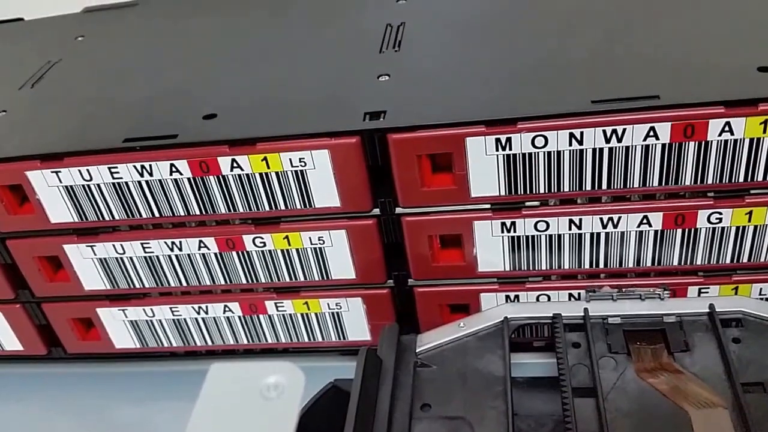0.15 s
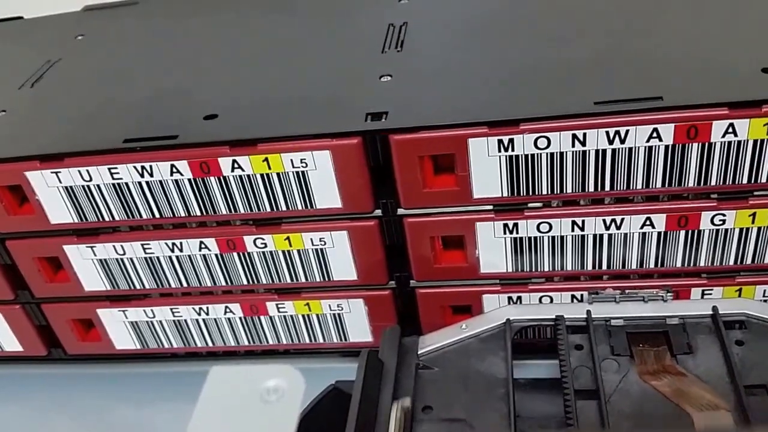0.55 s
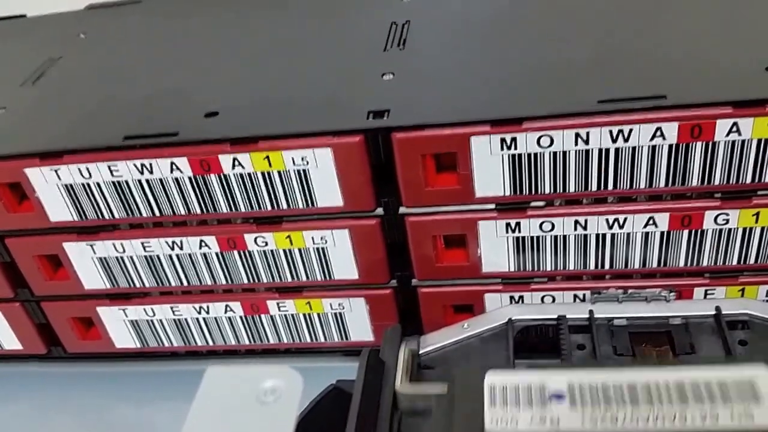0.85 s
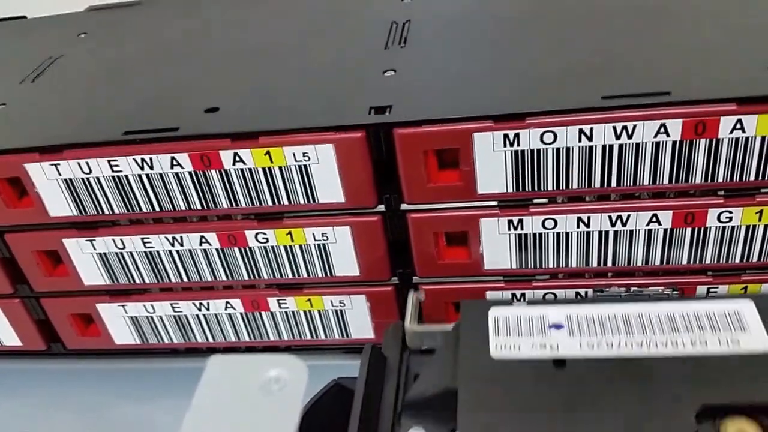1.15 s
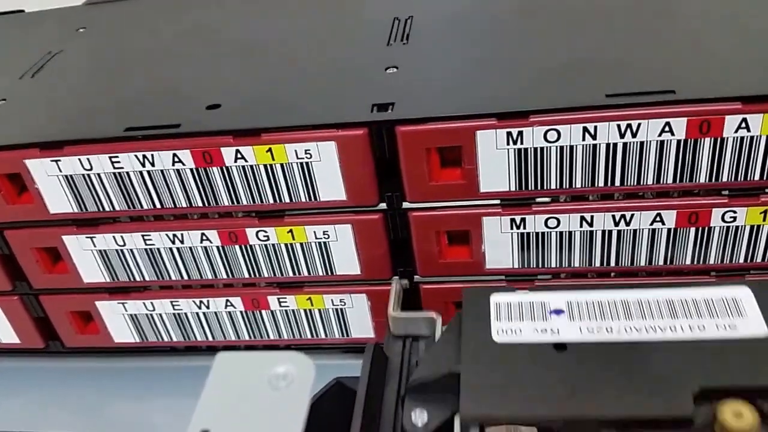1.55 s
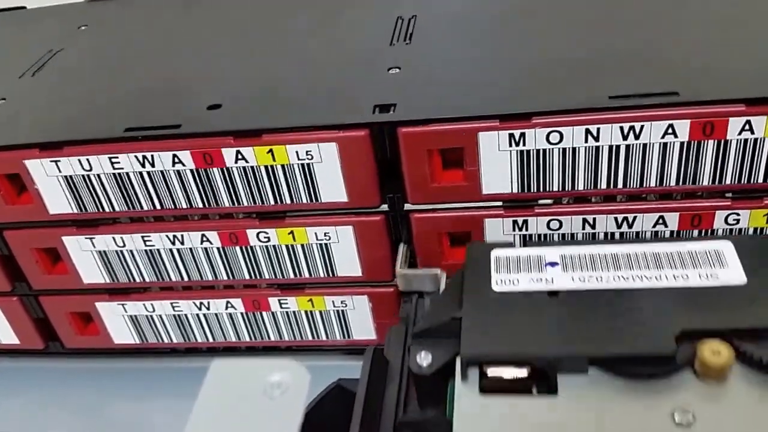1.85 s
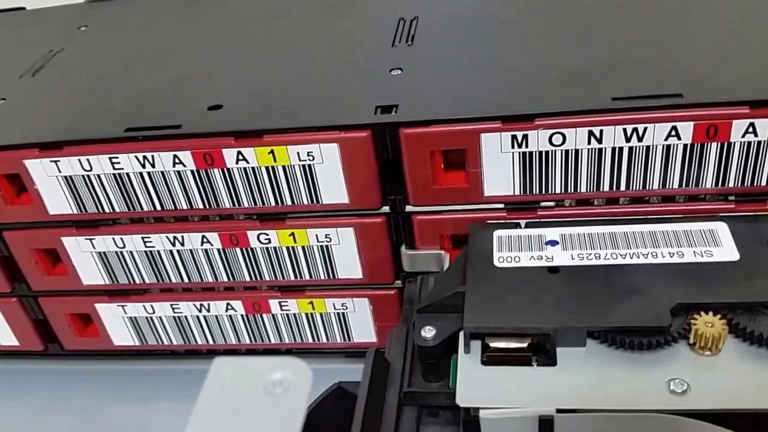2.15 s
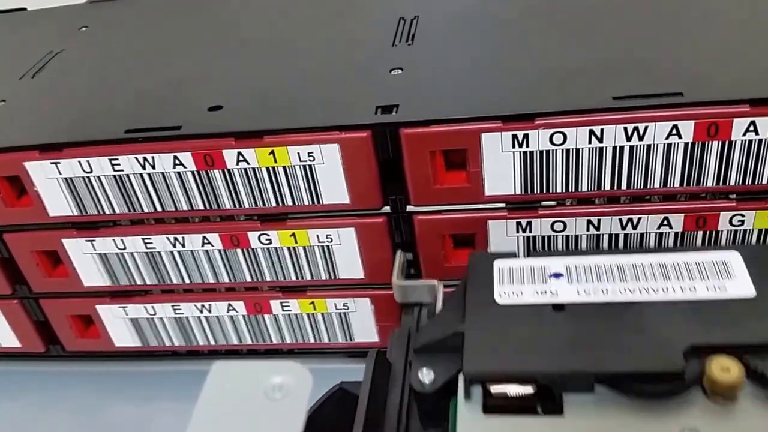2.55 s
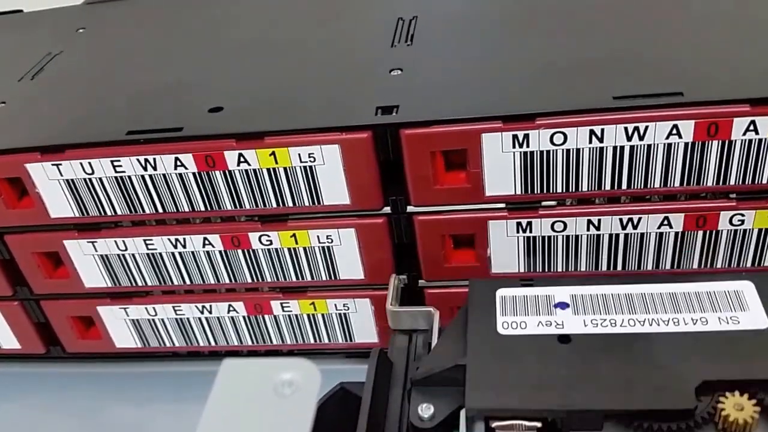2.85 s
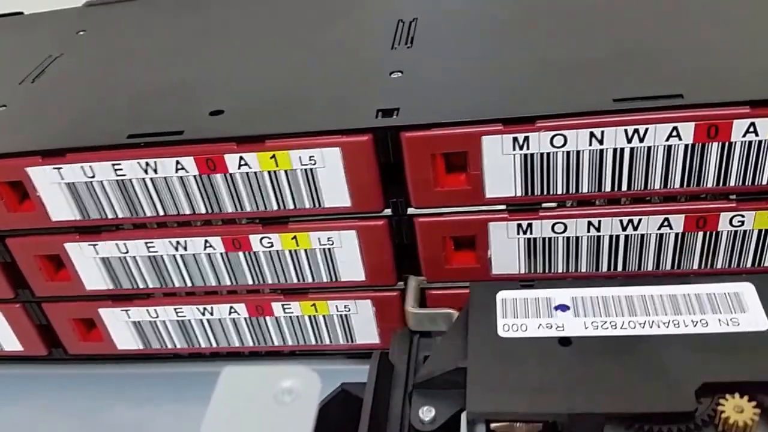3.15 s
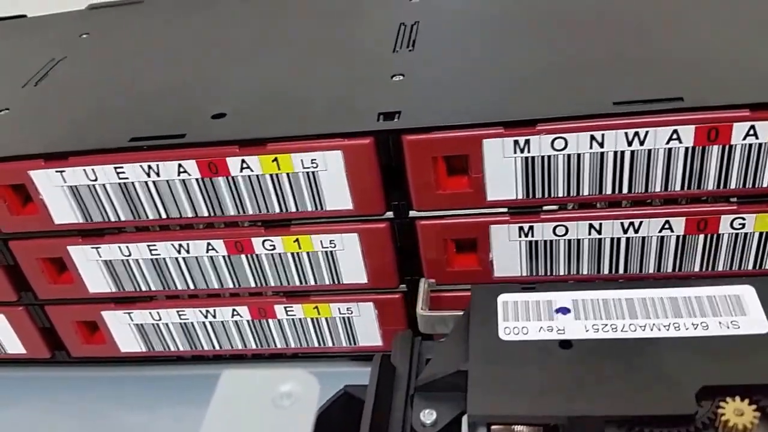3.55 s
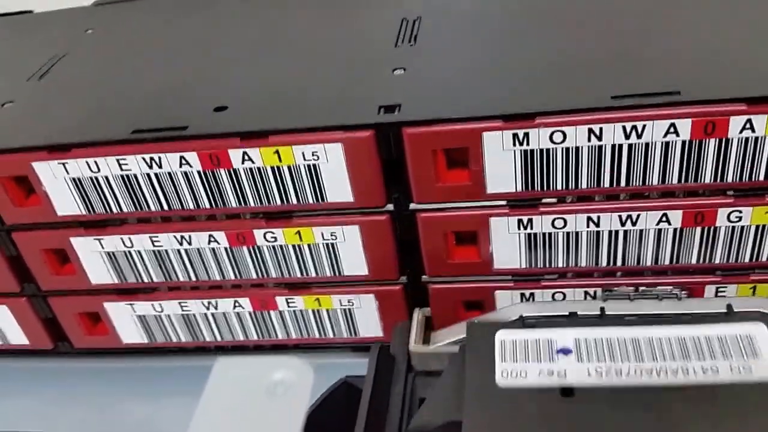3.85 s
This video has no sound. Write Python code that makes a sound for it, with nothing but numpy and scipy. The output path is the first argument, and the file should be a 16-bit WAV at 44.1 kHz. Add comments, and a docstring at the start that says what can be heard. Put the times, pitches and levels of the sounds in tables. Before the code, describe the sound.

Close stereo pickup inside a metal cabinet: a long rasping motor run with sharp knocks, then a clacking stop, two short grinding lifts, a brief scrape and a last faint whir, with quiet fans beneath.

```python
"""The picker of a tape library runs along its rail, close by inside the cabinet, then lifts, lowers and creeps.
Gear teeth are noisy scrapes that ring loose plastic parts, and the carriage judders as it settles.
Starts and stops shake the parts into bursts of impacts; single knocks fall on and between the bursts.
Fans hum underneath as coloured noise and wavering tones, and the cabinet adds a short diffuse tail."""
import sys
import numpy as np
from scipy import signal
from scipy.fft import rfft, irfft
from scipy.io import wavfile

SR = 44100
rng = np.random.default_rng(int(sys.argv[2]) if len(sys.argv) > 2 else 0)


def put_to_file(sound):
    """Save the sound as 16-bit audio at rate SR, in the file named by the first command-line argument."""
    columns = np.atleast_2d(sound).T  # one column per channel
    safe = np.clip(columns, -1, 1)
    whole_steps = np.round(safe * 32767)
    wavfile.write(sys.argv[1], SR, whole_steps.astype(np.int16))


N = 176400
T = np.arange(N) / SR
HZ = np.fft.rfftfreq(N, 1 / SR)
RUN_END_S = 1.257  # the long run along the rail stops here

# Every spectrum table gives a shape only: colour() sets its overall level.
# rumble of the frame: f/Hz, level per Hz/dB
FRAME_SPECTRUM = [(22, -16), (35, -3), (52, 1), (70, -3), (105, 0), (170, -6.5), (210, -9), (260, -13),
                  (400, -15.5), (600, -14.5), (800, -41.5), (1500, -100)]
# scrape of the creeping or juddering carriage: f/Hz, level per Hz/dB
CREEP_SPECTRUM = [(240, -37), (400, -40), (438, -31), (657, -5), (763, -9.5), (848, -6.5), (1690, -1),
                  (2060, -5), (3900, -5.5), (4450, -26), (5000, -7), (6950, -2.5), (9960, -2), (14500, -12)]


def amp(db):
    """Decibels to gain."""
    return 10 ** (np.asarray(db) / 20)


def unit(x):
    """Scales to rms 1."""
    return x / np.sqrt(np.mean(x ** 2) + 1e-20)


def read(points, hz):
    """Reads a table on a log-frequency axis."""
    f, value = np.transpose(points)
    return np.interp(np.log(hz + 1), np.log(f + 1), value)


def curve(rows, axis):
    """Reads one column of a time table at every sample."""
    rows = np.array(rows)
    return np.interp(T, rows[:, 0], rows[:, axis])


def drift(rate_hz):
    """Random wander of rms 1: noise whose spectrum falls off as a Gaussian above rate_hz."""
    hz = HZ[:N // 10]
    noise = rng.standard_normal(len(hz)) + 1j * rng.standard_normal(len(hz))
    return unit(irfft(noise * np.exp(-(hz / rate_hz) ** 2), N))


def gate(start, end, attack_s, release_s):
    """Linear attack, hold and exponential release."""
    attack = np.clip((T - start) / attack_s, 0, 1)
    return attack * np.exp(-np.maximum(T - end, 0) / release_s)


def after_run(decay_s):
    """One during the long run, then dying away."""
    return np.exp(-np.maximum(T - RUN_END_S, 0) / decay_s)


def colour(x, spectrum, lean_share=1.):
    """Gives two white channels a causal spectrum and stereo place, keeping the level of their mono mix."""
    # left minus right: f/Hz, level difference/dB
    lean_rows = [(60, -1.5), (170, -1), (450, -2), (750, -7), (1300, -10), (2100, -9), (2700, -3),
                 (3500, -6), (4700, -8), (6300, -20), (7800, -10), (9000, -2), (10300, 1.9), (12000, -3),
                 (15000, -3)]
    # likeness of the two channels: f/Hz, correlation/0-1
    alike_rows = [(50, 0.98), (125, 0.96), (250, 0.74), (500, 0.74), (1200, 0.34), (2200, 0.047)]
    alike = np.clip(read(alike_rows, HZ), 0, 1)
    lean = amp(lean_share * read(lean_rows, HZ) / 2)
    # roll-off below the first row of the spectrum
    below = np.minimum(HZ / spectrum[0][0], 1) ** 2
    shape = unit(amp(read(spectrum, HZ)) * below)
    sides = np.array([lean, 1 / lean]) * 2 / np.sqrt(lean ** 2 + lean ** -2 + 2 * alike)
    gain = shape * sides
    # minimum phase, so that nothing sounds ahead of its impact
    log_gain = np.log(gain.mean(0) + 1e-4)
    mirrored = np.r_[log_gain, log_gain[-2:0:-1]]
    phase = -signal.hilbert(mirrored).imag[:len(HZ)]
    a, b = rfft(x)
    left = alike * b + np.sqrt(1 - alike ** 2) * a
    return irfft(np.array([left, b]) * gain * np.exp(1j * phase), N)


def ring(force, ring_s, count):
    """Each impact lands on one of a few parts, which rings briefly with dense modes."""
    t = T[:2048]
    part = rng.integers(0, count, N)
    out = 0
    for k in range(count):
        body = rng.standard_normal((2, len(t))) * np.exp(-t / ring_s)
        body = body / np.linalg.norm(body, axis=1, keepdims=True)
        hits = (force * (part == k))[None]
        out = out + signal.oaconvolve(hits, body, axes=1)[:, :N]
    return out


def rasp(turns, contact, spread_db):
    """One noise scrape of uneven strength per cycle, dying away over a share `contact` of it."""
    strengths = amp(spread_db * np.tanh(rng.standard_normal(N)))
    size = strengths[np.floor(turns).astype(int)]
    return unit(size * np.exp(-(turns % 1) / contact) * rng.standard_normal(N))


def teeth(hz, spread_db, play_db, contact, grind_db):
    """One scrape per tooth over a fine grind, swelling as the pinion's play opens and closes."""
    pinion_hz = 84.8
    clump_db, clump_hz = 1.5, 110  # the scrapes come in uneven clumps
    turns = np.maximum.accumulate(hz * T + .08 * drift(hz))  # never runs backwards
    scrapes = rasp(turns, contact, spread_db)
    play = play_db * np.sin(2 * np.pi * pinion_hz * T + 2.2 * drift(12))
    clumps = clump_db * np.tanh(drift(clump_hz))
    grind = amp(grind_db) * rng.standard_normal(N)
    return unit((scrapes + grind) * amp(play + clumps))


def sing(hz, width_hz):
    """A rubbed resonance: a fuzzy tone of rms 1 that can follow a curve."""
    turn = 2 * np.pi * np.cumsum(hz * np.ones(N)) / SR
    return unit(drift(width_hz) * np.cos(turn) + drift(width_hz) * np.sin(turn))


def moves(rows, attack_s, release_s):
    """Drive level of a list of moves, each gliding between its two levels."""
    level = 0
    for start, end, db0, db1 in rows:
        glide = amp(np.interp(T, [start, end], [db0, db1]))
        level = level + gate(start, end, attack_s, release_s) * glide
    return level


def knocks(rows, knock_s):
    """Single impulses, each with the energy of knock_s seconds at its listed level."""
    force = np.zeros(N)
    for s, db in rows:
        force[int(s * SR)] += amp(db) * np.sqrt(knock_s * SR)
    return force


def long_run():
    """Rattling gears, rollers on a ringing rail and motor hum; the frame rumbles on a little after the stop."""
    # the run along the rail: t/s, gear rattle level/dB, roller noise level/dB, frame rumble level/dB
    run = [(0.0, -34.5, -39, -38), (0.128, -37.5, -43, -44), (0.154, -35, -39, -39),
           (0.54, -29.5, -34.5, -35), (0.708, -32, -35.5, -35.5), (0.714, -30, -34.5, -35.5),
           (0.936, -29.5, -35.5, -33.5), (0.992, -31, -36.5, -37), (1.102, -32.5, -32.5, -34),
           (1.234, -30, -37, -34), (1.26, -31, -40.5, -36.5)]
    # resonance of the rail under the rollers: t/s, f/Hz, level/dB
    rail_rows = [(0, 1567, -39.5), (.3, 1546, -38), (.55, 1574, -35.5), (.66, 1449, -53), (.78, 1370, -33),
                 (.87, 1300, -58), (1.1, 1234, -38), (1.26, 1246, -57)]
    # rattle of the gears: f/Hz, level per Hz/dB
    gear_spectrum = [(1530, -42), (2600, -11), (2850, -21.5), (3390, -4.5), (4660, -13.5), (5220, -8),
                     (5650, -11), (6120, -8.5), (6670, -7), (7950, -3), (8600, -8), (10100, -2),
                     (11100, -5), (12600, -7.5), (14500, -15)]
    # noise of the rollers: f/Hz, level per Hz/dB
    roller_spectrum = [(260, -46), (400, -13), (623, -10), (713, -10), (760, -3), (891, -8), (1190, -0.5),
                       (1560, 0), (1880, -3), (2480, -5.5), (3000, -12), (3900, -21.5), (6600, -120)]
    # motor hum: multiple of the tooth rate, level/dB
    hum_rows = [(1, -51), (2, -51.5), (3, -61.5), (4, -60.5), (6, -50.5)]
    tooth_hz = 206.17
    on = after_run(0.014)

    force = teeth(tooth_hz, spread_db=6.0, play_db=1.5, contact=0.39, grind_db=-3)
    force = force * on * amp(curve(run, axis=1))
    gears = colour(ring(force, ring_s=0.0029, count=3), gear_spectrum)

    force = teeth(tooth_hz, spread_db=3.5, play_db=2.5, contact=0.16, grind_db=-1)
    force = force * on * amp(curve(run, axis=2))
    rollers = colour(ring(force, ring_s=0.0052, count=4), roller_spectrum)

    settling = np.maximum(on, amp(-5) * after_run(0.23))
    rumble = colour(rng.standard_normal((2, N)), FRAME_SPECTRUM)
    rumble = rumble * settling * amp(curve(run, axis=3))

    afterring = colour(rng.standard_normal((2, N)), roller_spectrum) * amp(-57.0)
    afterring = afterring * gate(RUN_END_S, RUN_END_S, attack_s=0.0081, release_s=0.16)

    rail = sing(curve(rail_rows, axis=1), width_hz=120) * amp(curve(rail_rows, axis=2))
    turn = 2 * np.pi * np.cumsum(tooth_hz * (1 + .0015 * drift(10))) / SR
    hum = 0
    for k, db in hum_rows:
        hum = hum + amp(db) * unit(np.sin(round(k) * turn) * (1 + 0.79 * drift(15.0)))
    # left and right gains/dB: the rail sits well to the right, the hum slightly
    tones = rail * amp([[-10], [1]]) + hum * amp([[-2], [1.5]])
    return gears + rollers + rumble + afterring + on * tones


def whines(drive):
    """Parts that the drive shakes into resonance for a while, in step with its rattle."""
    # resonances: start t/s, end t/s, f/Hz, width/Hz, gain/dB
    resonances = [(0, .72, 3530, 450, -7), (0.853, 1.262, 10330, 497, -2), (1.364, 1.5, 1710, 220, 6),
                  (1.366, 1.44, 9600, 1500, -3), (1.62, 2.85, 1630, 159, -2), (3.167, 3.384, 1720, 150, 6),
                  (3.197, 3.34, 6900, 600, 0.5), (3.742, 4, 1110, 300, 5.5), (3.86, 3.975, 1640, 120, 6)]
    out, spectrum = 0, rfft(drive)
    for start, end, hz, width_hz, db in resonances:
        tone = irfft(spectrum / (1 + 2j * (HZ - hz) / width_hz), N)
        out = out + tone * gate(start, end, attack_s=0.0057, release_s=.006) * amp(db)
    return out


def cabinet(x):
    """A short diffuse tail from the metal enclosure: noise whose decay time depends on frequency."""
    # decay of the enclosure: f/Hz, time to fall by 60 dB/s
    decay = [(200, 0.19), (1500, 0.86), (5000, 0.28), (14000, 0.15)]
    hz, t, noise = signal.stft(rng.standard_normal((2, SR // 2)), SR, nperseg=256)
    fall = amp(-60 * t / read(decay, hz)[:, None])
    tail = signal.istft(noise * fall, SR, nperseg=256)[1]
    tail = tail * np.minimum(T[:tail.shape[1]] / 0.0029, 1)  # soft onset
    return signal.fftconvolve(x, tail / np.linalg.norm(tail[0]), axes=1)[:, :N]


def fans():
    """Steady rush of air with blade tones that waver in pitch and strength."""
    # rush of air: f/Hz, level per Hz/dB
    air_spectrum = [(20, -6.5), (54, 0.5), (85, -3.5), (140, -3), (200, -11), (290, -15), (450, -15),
                    (700, -17), (900, -22.5), (1150, -20), (1600, -23.5), (2400, -26), (4400, -39),
                    (5300, -33), (7000, -48), (11000, -47), (15000, -61)]
    # blade tones: f/Hz, level/dB, left minus right/dB
    blade_tones = [(57, -62, -7.5), (203, -70, 2), (409.3, -65, 1.5), (773, -70, -19.5), (1535, -69, -14),
                   (2400, -81.5, -24), (3060, -83, 6)]
    air = colour(rng.standard_normal((2, N)), air_spectrum, lean_share=0.79)
    out = air * amp(-49 + 0.17 * drift(2.7))
    for hz, db, lean_db in blade_tones:
        turn = 2 * np.pi * np.cumsum(hz + 2.7 * drift(17.0)) / SR
        tone = np.sin(turn) * (1 + 0.35 * drift(12))
        out += unit(tone) * amp([[db + lean_db / 2], [db - lean_db / 2]])
    return out


def chatter(impacts_per_s=850, spread_db=4):
    """Loose parts clatter in quick runs of impacts at every jolt; single knocks fall within and between them."""
    # jolts as a motor starts or brakes: start t/s, length/s, level/dB
    jolts = [(1.279, 0.03, -32.5), (1.283, 0.0092, -24), (1.517, 0.012, -25), (1.588, 0.024, -25.5),
             (2.115, 0.009, -27.5), (2.325, 0.042, -33.5), (2.362, 0.013, -32), (2.426, .011, -29),
             (2.442, 0.014, -29), (2.833, .015, -29), (2.878, 0.025, -31.5), (2.908, 0.011, -36.5),
             (2.942, 0.0083, -32), (3.686, 0.014, -34), (3.694, 0.016, -31.5)]
    # single knocks of loose parts: t/s, level/dB
    single_knocks = [(.309, -19.5), (.753, -17.5), (0.805, -18.5), (.900, -20.5), (.944, -27),
                     (1.242, -19.5), (1.439, -26), (1.524, -26.5), (1.588, -20.5), (2.065, -31.5),
                     (2.118, -26.5), (2.362, -29.5), (2.574, -33.5), (2.839, -27), (2.877, -27),
                     (2.885, -21.5), (2.932, -19), (2.94, -25), (3.137, -48.5), (3.167, -25), (3.184, -29),
                     (3.199, -28.5), (3.263, -27), (3.364, -28.5), (3.711, -26), (3.838, -31)]
    # clatter of the loose parts: f/Hz, level per Hz/dB
    loose_spectrum = [(260, -41), (450, -28.5), (561, -6.5), (774, -31.5), (965, -9), (1710, -1),
                      (2070, -8), (2540, -7), (3030, -8.5), (4500, -12.5), (5140, -6), (5780, -5),
                      (10100, 1), (11700, 0), (14100, -2.5), (15000, -7.5)]
    force = knocks(single_knocks, knock_s=0.0019)
    for start, length, db in jolts:
        count = max(int(length * impacts_per_s), 2)
        at = start + length * (np.arange(count) + rng.random(count)) / count
        sizes = unit(amp(spread_db * rng.standard_normal(count)))
        # fewer impacts hit harder, so the burst keeps its level
        force[(at * SR).astype(int)] += amp(db) * sizes * np.sqrt(length * SR / count)
    return colour(ring(force, ring_s=0.0044, count=6), loose_spectrum)


def judder():
    """Braking after the long run, the carriage sticks and slips in a quick rattle of changing rate."""
    # stick-slip rattle: t/s, slip rate/Hz, level/dB
    slips = [(1.367, 126, -38.5), (1.436, 128, -34.5), (1.448, 73, -37.5), (1.512, 89, -40)]
    on = gate(slips[0][0], slips[-1][0], attack_s=.001, release_s=.001)
    turns = np.cumsum(curve(slips, axis=1) * on) / SR
    force = rasp(turns, contact=0.34, spread_db=0.0) * on
    # rms near 1 while it lasts, then the listed level
    force = unit(force) * np.sqrt(on.mean()) * amp(curve(slips, axis=2))
    return colour(ring(force, ring_s=0.0042, count=3), CREEP_SPECTRUM)


def lift():
    """The lift pinion ticks along its rack and shakes the frame, which sways on after each move."""
    # lift moves: start t/s, end t/s, level at start/dB, level at end/dB
    lift_moves = [(1.612, 2.118, -40.5, -39.5), (2.456, 2.835, -44, -39.5), (3.714, 3.88, -44, -43.5),
                  (3.88, 4.0, -42, -43.5)]
    # ticking of the rack: f/Hz, level per Hz/dB
    rack_spectrum = [(260, -25.5), (450, -15), (491, -7), (716, -21.5), (782, -16), (930, -9.5),
                     (1300, -6.5), (1690, -5), (2540, -6), (3060, -16.5), (3700, -4.5), (4400, -20.5),
                     (5090, -8), (6520, -8.5), (7760, -3.5), (12000, -3), (14500, -11)]
    # the lift meshes at this tooth rate/Hz
    force = teeth(206.17, spread_db=2.5, play_db=1.5, contact=.22, grind_db=-4.5)
    force = force * moves(lift_moves, attack_s=0.0047, release_s=0.0069)
    rumble = colour(rng.standard_normal((2, N)), FRAME_SPECTRUM) * amp(-12.5)
    rumble = rumble * moves(lift_moves, attack_s=.01, release_s=0.2)
    return colour(ring(force, ring_s=0.0031, count=3), rack_spectrum) + rumble


def bumps():
    """The carriage takes up its play with a dull knock against its guides."""
    # bumps: t/s, level/dB
    bump_rows = [(2.839, -50), (3.364, -45.5), (3.375, -43), (3.709, -40.5)]
    # dull thud of the guides: f/Hz, level per Hz/dB
    bump_spectrum = [(200, -7), (500, 5), (900, 9), (1400, 10), (2000, 8.5), (3000, -16), (6000, -51)]
    force = knocks(bump_rows, knock_s=0.013)
    return colour(ring(force, ring_s=0.011, count=3), bump_spectrum)


def creep():
    """The rail drive nudges the carriage slowly sideways with a dense, even scrape."""
    # sideways moves: start t/s, end t/s, level at start/dB, level at end/dB
    creep_moves = [(3.166, 3.3, -40.5, -40.5), (3.3, 3.385, -45, -48.5)]
    creep_hz = 220  # tooth rate
    force = teeth(creep_hz, spread_db=2, play_db=1, contact=.3, grind_db=0)
    force = force * moves(creep_moves, attack_s=.002, release_s=.008)
    return colour(ring(force, ring_s=0.0053, count=3), CREEP_SPECTRUM)


def scene():
    """The picker close by in its cabinet, over the fans."""
    drive = long_run() + judder() + lift() + creep()
    robot = drive + whines(drive) + chatter() + bumps()
    return robot + amp(-16) * cabinet(robot) + fans()


def record(dry):
    """The band limit of the recorder: a steep low-pass."""
    edge_hz = 14650
    return signal.sosfilt(signal.butter(22, edge_hz, fs=SR, output="sos"), dry)


dry = scene()
out = record(dry)
put_to_file(out)
```